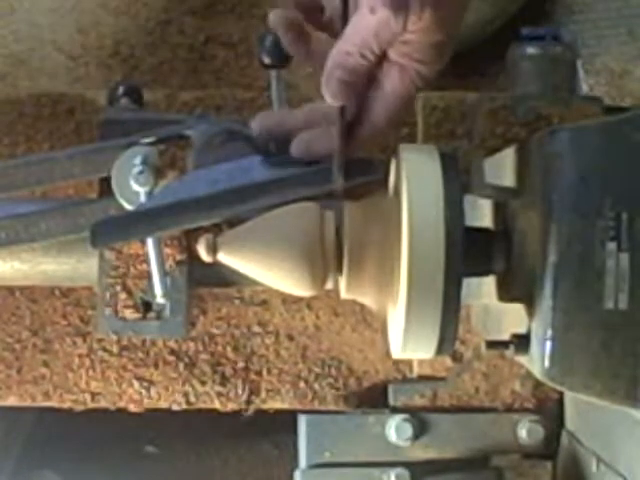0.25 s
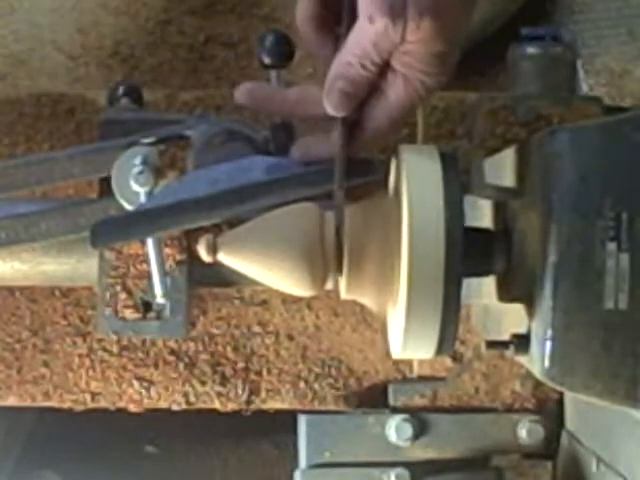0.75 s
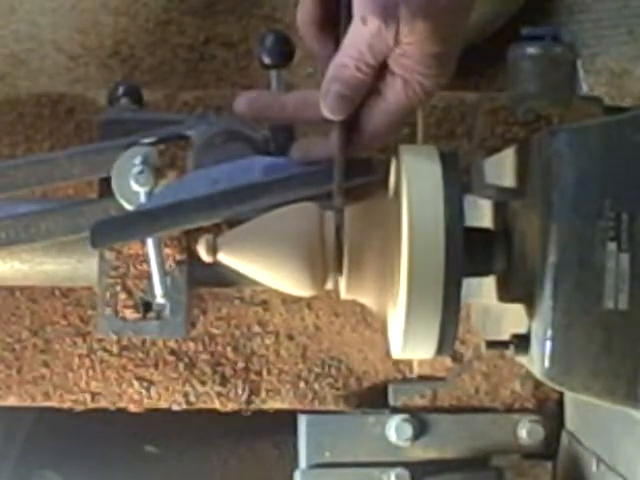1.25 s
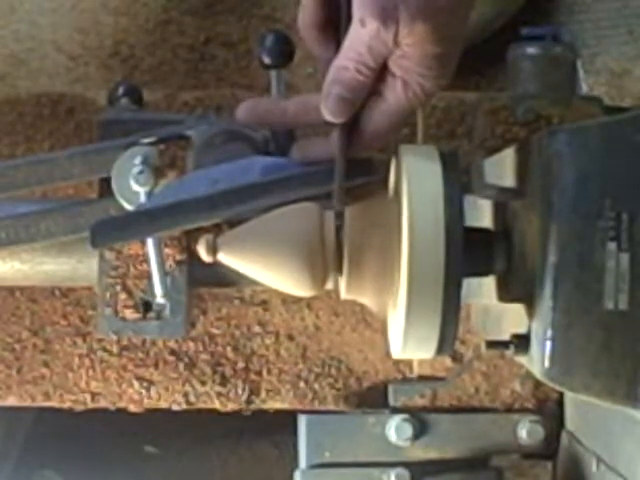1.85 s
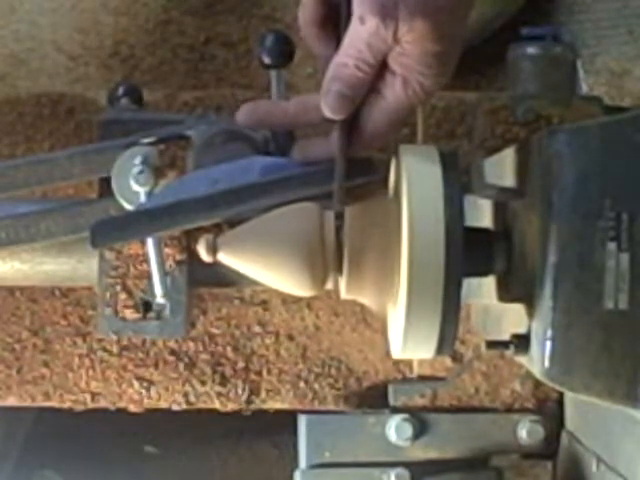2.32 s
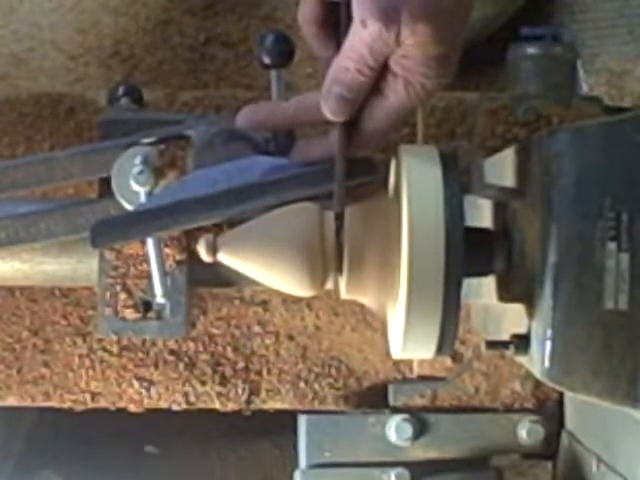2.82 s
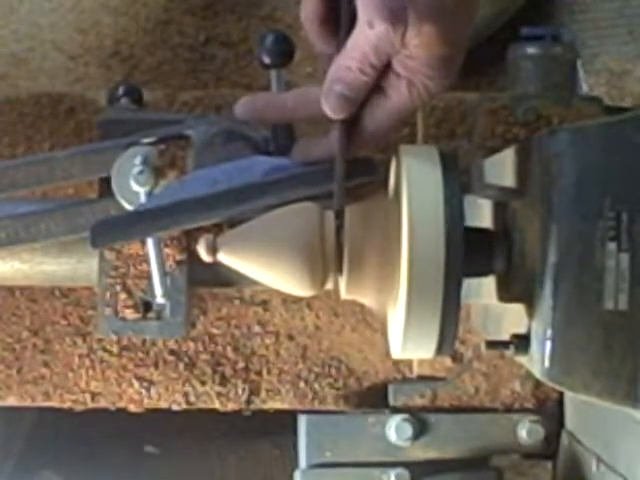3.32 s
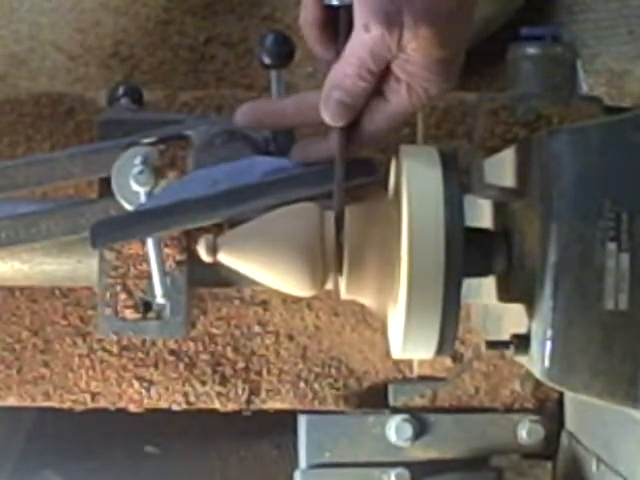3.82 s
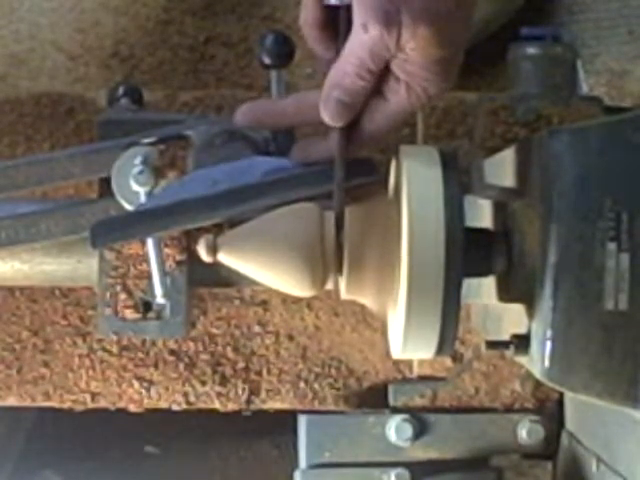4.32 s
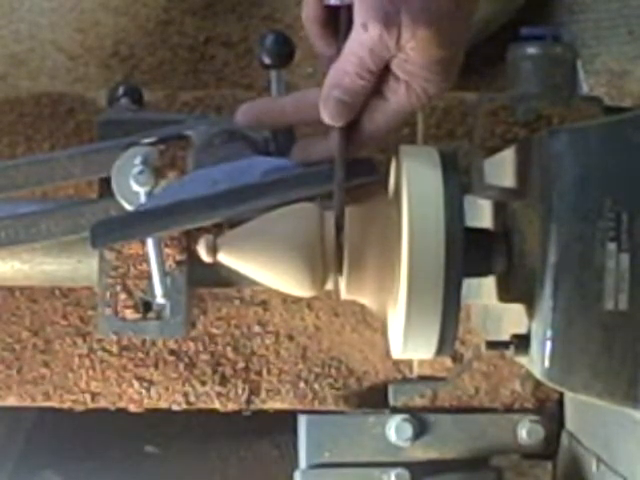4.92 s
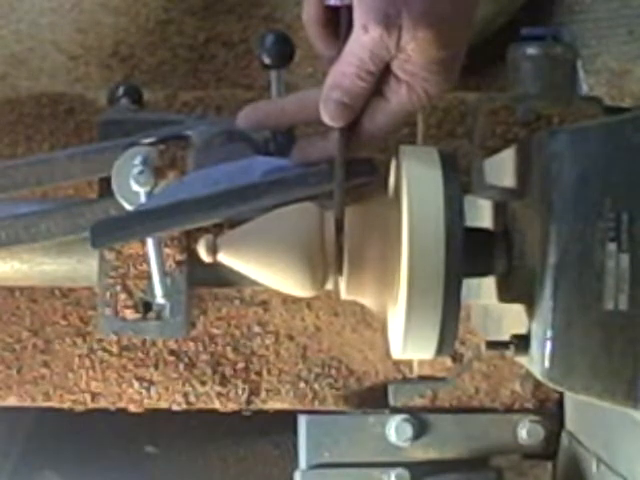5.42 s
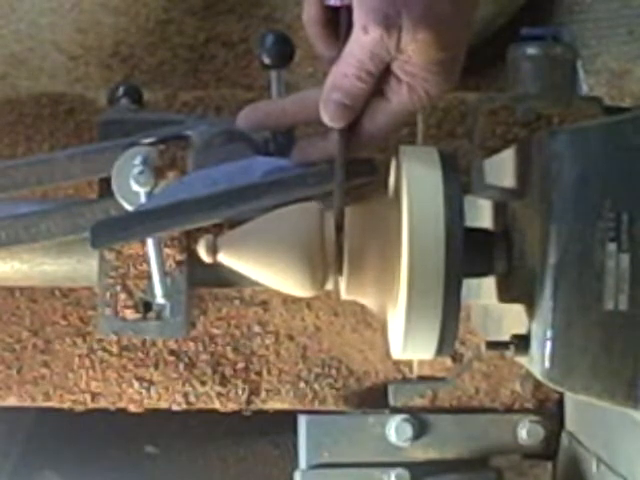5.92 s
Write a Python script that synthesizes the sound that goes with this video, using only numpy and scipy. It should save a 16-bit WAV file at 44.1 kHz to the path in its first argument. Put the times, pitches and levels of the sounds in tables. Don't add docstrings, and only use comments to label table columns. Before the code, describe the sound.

Throbbing motor hum and faint metallic buzzes give way to two harsh, ringing scrapes of a steel tool on fast-turning wood.

```python
import sys
import numpy as np
from scipy import signal
from scipy.fft import rfft, irfft, next_fast_len
from scipy.io import wavfile
from scipy.ndimage import uniform_filter1d

SR = 44100
rng = np.random.default_rng(int(sys.argv[2]) if len(sys.argv) > 2 else 0)


def magnitude_from_level(level_db):
    exponent = np.asarray(level_db, float) / 20
    return 10 ** exponent


def unload_wav(signal):
    wavfile.write(
        sys.argv[1],
        SR,
        np.round(np.clip(np.atleast_2d(signal).T, -1, 1) * 32767).astype(np.int16),
    )


N = 271656
REGRIP_S = 3.2
MAINS_HZ, BELT_HZ = 60.0, 5.96
SPINDLE_HZ = 24.5


def rms_one(x):
    return x / np.sqrt(np.mean(x ** 2) + 1e-20)


def in_time(rows):
    s, *columns = np.transpose(rows)
    return [np.interp(np.arange(N) / SR, s, c) for c in columns]


def at_hz(points, hz):
    table_hz, values = np.array(points).T[:2]
    return np.interp(np.log(hz + 1), np.log(table_hz), values)


def drift(rate):
    r = np.exp(-80 * np.pi * rate / SR)
    chance = rng.standard_normal(N // 40 + 2002)
    slow = signal.lfilter([1], [1, -2 * r, r * r], chance)[2000:]
    return np.interp(np.arange(N) / 40, np.arange(len(slow)), rms_one(slow))


def resonance(x, hz, width_hz):
    r = np.exp(-np.pi * width_hz / SR)
    top = np.array([1, 0, -1]) * (1 - r * r) / 2
    return signal.lfilter(top, [1, -2 * r * np.cos(2 * np.pi * hz / SR), r * r], x)


def coloured(x, gain):
    size = next_fast_len(N)
    return irfft(rfft(x, size) * gain(np.fft.rfftfreq(size, 1 / SR)), size)[:N]


def spells(rows, swell_s):
    t = np.arange(N) / SR
    gain = np.zeros(N)
    for s, length_s, level_db in rows:
        to_nearest_end = np.minimum(t - s, s + length_s - t)
        gain += magnitude_from_level(level_db) * np.clip(to_nearest_end / swell_s + .5, 0, 1) ** 2
    return gain


def by_cut(first, second):
    return np.where(np.arange(N) / SR < REGRIP_S, first, second)


# (time [s], level [dB])
PRESSURE = [(1.4, -48.5), (1.49, -43.5), (1.53, -32), (1.66, -31), (1.73, -22), (2.04, -22), (2.4, -19.5),
            (2.78, -22), (2.9, -19.5), (3.03, -22.5), (3.15, -43), (3.24, -36.5), (3.47, -34.5),
            (3.58, -28.5), (3.79, -28), (3.86, -25), (5.35, -21), (6.16, -22)]


def pressure_swing():
    firm_db = -22
    return in_time(PRESSURE)[0] - firm_db


# (mains multiple [count], belt multiple [count], level [dB], lead [rad])
HUM = [(4, 0, -27.5, 0), (4, -3, -35, -1.15), (4, -2, -39, 2.1), (4, -1, -41, 0.3), (4, 1, -46, -2.6),
       (4, 2, -39, 2.4), (4, 3, -46, 2.3), (2, 0, -47, 0), (2, -3, -45, -1.3), (2, 3, -50, -0.2)]
# (pitch [Hz], level [dB])
WHINE = [(594, -58), (812, -57), (2379, -67), (6643, -69), (7596, -68), (7655, -68)]
# (frequency [Hz], level [dB per Hz])
IDLE = [(12, -61), (22, -20), (54, -16.5), (108, -21), (162, -18.5), (300, -16.5), (400, -18), (680, -21.5),
        (1660, -31), (3300, -31.5), (4720, -24.5), (5600, -33), (7100, -31), (8000, -46), (9000, -57),
        (12000, -87)]
# (pitch [Hz], width [Hz], level [dB])
BED = [(3775, 230, -52), (4250, 260, -53.5), (4560, 260, -55), (2530, 380, -55.5), (6460, 190, -54.5)]
# (pitch [Hz], width [Hz], level [dB])
BED_BOOM = (230, 45, -37)


def motor():
    t = np.arange(N) / SR
    load = uniform_filter1d(magnitude_from_level(pressure_swing()), size=6000)
    flap_db = 2 - 9.5 * load
    out = np.zeros(N)
    for mains, belt, level_db, lead in HUM:
        loose_db = flap_db if mains == 4 and belt else 0
        sway = magnitude_from_level(level_db + loose_db + 0.32 * drift(3.9))
        hz = mains * MAINS_HZ + belt * BELT_HZ
        out += np.sqrt(2) * sway * np.cos(2 * np.pi * hz * t + lead + 0.83 * drift(0.92))
    for hz, level_db in WHINE:
        sway = magnitude_from_level(level_db + 6.9 * drift(15.0))
        out += np.sqrt(2) * sway * np.cos(2 * np.pi * hz * t + 0.36 * drift(1.9))
    for hz, width_hz, level_db in BED + [BED_BOOM]:
        rumble = resonance(resonance(rng.standard_normal(N), hz, width_hz), hz, width_hz)
        out += magnitude_from_level(level_db) * rms_one(rumble)
    fan = coloured(rng.standard_normal(N), lambda hz: magnitude_from_level(at_hz(IDLE, hz)))
    return out + magnitude_from_level(-36.5 + 0.8 * drift(14)) * rms_one(fan)


# (time [s], length [s], level [dB])
GUARD = [
    (.03, .12, -46),
    (.25, .05, -45),
    (.41, .04, -37),
    (.68, 0.32, -44.5),
    (1.15, 0.075, -43),
    (1.3, 0.44, -45),
    (1.9, 0.098, -42),
    (2.07, 0.067, -29),
    (2.25, 0.146, -56),
]


def guard():
    always = (2.4, N / SR, -52.5)
    gain = spells(GUARD + [always], swell_s=0.12)
    return np.sqrt(2) * gain * np.cos(2 * np.pi * 685 * np.arange(N) / SR + 1.0 * drift(9.1))


# (time [s], peak level [dB])
SET_DOWN = [
    (0.098, -28.5),
]


def knocks():
    clicks = np.full(N, 1e-18)
    for s, peak_db in SET_DOWN:
        clicks[round(s * SR)] = magnitude_from_level(peak_db + 43.5)
    low, middle = resonance(clicks, 550, 25), resonance(clicks, 700, 30)
    return low + .25 * middle + 0.24 * resonance(clicks, 1150, 60)


def chips(dust_db):
    strength = magnitude_from_level(3.2 * np.minimum(rng.exponential(1, N), 3))
    snaps = (rng.random(N) < 120 / SR) * strength * rng.choice([-1, 1], N)
    return magnitude_from_level(dust_db + 13.5) * resonance(resonance(snaps + 1e-18, 8000, 1200), 7400, 1300)


# (pitch [Hz], width [Hz])
BLADE = [(1635, 120), (1780, 35), (2415, 40), (4740, 220), (4130, 45), (5110, 70), (3480, 260), (2020, 40)]
# (time [s], length [s], level [dB])
SPELLS = [
    [(1.66, 0.317, -33.5), (2.3, .75, -39.5), (3.25, .3, -45), (5.1, 0.89, -40)],
    [(1.67, .14, -40), (2.2, 0.45, -38.5), (2.72, 0.34, -33), (5.05, 0.67, -40)],
    [(1.5, .1, -43), (2.2, .6, -35.5), (3.3, .12, -36), (3.9, 0.16, -37), (4.7, 1, -43.5)],
    [(1.72, 0.52, -33), (2.3, .75, -31.5), (3.56, .1, -25), (4.25, 0.35, -28)],
    [(1.95, 1.1, -36.5), (4.9, 0.69, -36)],
    [(2.145, .9, -25.5)],
    [(1.56, .2, -31.5), (3.05, 1.6, -36), (3.6, 0.73, -45.5)],
    [(1.57, .06, -31), (3.1, .12, -43)],
]
MURMUR_DB = (-46.5, -45.5, -43, -32.5, -43, -44, -40.5, -57.5)
KNOCK_DB = (5.3, 4, 1.1, .6, 1.1, .6, .6, .6)


def blade(force, turns, swing_db):
    end_grain = 4 * np.pi * turns
    kicked = force * magnitude_from_level(1.4 * np.cos(end_grain))
    out = np.zeros(N)
    for (hz, width_hz), rows, murmur_db, knock_db in zip(BLADE, SPELLS, MURMUR_DB, KNOCK_DB):
        ring = resonance(resonance(kicked, hz, width_hz), hz, 3 * width_hz)
        slow = np.sqrt(uniform_filter1d(ring ** 2, size=6000))
        gain = np.hypot(spells(rows, swell_s=0.05), magnitude_from_level(murmur_db + 0.68 * swing_db))
        out += gain / 2 * ring / slow * magnitude_from_level(knock_db * np.cos(end_grain + 1.8))
    return out


MULTIPLES = [4, 8, 9, 10, 11, 12, 13, 14, 16, 17, 18, 19, 20, 21, 22, 23, 24, 25, 26, 27, 28, 32, 36]
# (first cut level [dB], second cut level [dB])
THRUST = [(-15.5, -18), (-6, -6), (-14, -15.5), (-50, -3.5), (-12, -15), (-23, -26), (-21, -17), (-8, -7.5),
          (-17, -25), (-15.5, -28), (-17, -22), (-20, -22.5), (-13, -25), (-21.5, -17.5), (-8, -9.5),
          (-17, -13), (-11.5, -8.5), (-23, -11.5), (-24.5, -30.5), (-29.5, -12), (-16.5, -16), (-24, -18.5),
          (-19, -19)]


def thrust(turns, depth_s, rest_hz):
    out = magnitude_from_level(-6.5) * rms_one(resonance(rng.standard_normal(N), 556, 150))
    for multiple, level_db in zip(MULTIPLES, THRUST):
        darker_db = 1 * (depth_s - 1) * np.clip(np.log2(16 / multiple), -1, 1)
        off_rest = (multiple * SPINDLE_HZ - rest_hz) / 26
        lift_db = 6 / (1 + off_rest ** 2)
        level = magnitude_from_level(by_cut(*level_db) + darker_db + lift_db + 1.3 * drift(5.9))
        lead = -.1 + .11 * rng.standard_normal()
        phase = 2 * np.pi * (multiple * (turns + .5) + lead)
        out += np.sqrt(2) * level * np.cos(phase + 0.67 * drift(3.4))
    return out


def round_the_blank(turns, size, memory):
    count, keep = int(turns[-1]) + 42, np.clip(memory, 0, .99)
    fresh = rng.standard_normal((count, size))
    surface = signal.lfilter([np.sqrt(1 - keep ** 2)], [1, -keep], fresh, axis=0)[40:].ravel()
    return np.interp(turns * size, np.arange(len(surface)), surface)


# (frequency [Hz], share [0-1])
REPEATS = [(700, .85), (2500, 0.44), (3300, 0.42), (5000, 0.24), (8000, 0.34)]


def scraping(turns):
    bite_db = 1.1 * round_the_blank(turns, size=10, memory=.9)
    bite_db += .5 * np.cos(4 * np.pi * turns) + 0.52 * drift(21)
    bite_db += 0.58 * np.cos(6 * np.pi * BELT_HZ * np.arange(N) / SR + .3)
    grain = round_the_blank(turns, size=1024, memory=0.934)

    def share(hz):
        return np.clip(at_hz(REPEATS, hz), 0, 1)

    def grain_gain(hz):
        return np.sqrt(share(hz)) / np.clip(np.sinc(hz / 25000) ** 2, .1, 1)

    returning = coloured(grain, grain_gain)
    tearing = rng.standard_normal(N) * magnitude_from_level(0.75 * np.minimum(rng.exponential(1, N), 3))
    fresh = coloured(rms_one(tearing), lambda hz: np.sqrt(1 - share(hz)))
    return magnitude_from_level(bite_db) * (1.3 * returning + fresh)


# (pitch [Hz], width [Hz], level [dB])
TIP_RING = (5110, 150, 5)


def tool(force, colour, rings):
    x = force.copy()
    for hz, width_hz, level_db in rings + [TIP_RING]:
        x += magnitude_from_level(level_db + 0.5) * resonance(force, hz, width_hz)
    return coloured(x, lambda hz: magnitude_from_level(at_hz(colour, hz)))


# (frequency [Hz], level [dB per Hz])
FIRST = [(410, -37), (700, -6), (730, -20), (876, -14), (1430, -14.5), (1730, -11), (2030, -11.5),
         (2360, -8), (2740, -10.5), (3980, -0.5), (4330, -2), (5140, -7.5), (5480, -6.5), (7000, -9),
         (8940, -37), (11600, -67), (19700, -120)]
# (frequency [Hz], level [dB per Hz])
SECOND = [(410, -48.5), (700, -4), (730, -34), (1010, -7.5), (1440, -13), (1660, -7.5), (2120, -6.5),
          (2410, -4.5), (2830, -12.5), (3180, -7.5), (3980, 4.5), (4330, 0.5), (4920, -6.5), (7150, -8),
          (8940, -35.5), (11600, -69), (19700, -120)]
# (pitch [Hz], width [Hz], level [dB])
FIRST_RING = [(3225, 60, -1), (3840, 80, -4), (4128, 60, 1), (4740, 150, -5), (6310, 70, -7)]
# (pitch [Hz], width [Hz], level [dB])
SECOND_RING = [(3230, 140, 3.5), (3714, 54, 1), (4010, 170, -13.5), (5000, 640, -5), (6430, 59, -6.5),
               (7730, 23, -2), (8100, 74, -19.5)]
# (time [s], peak level [dB])
TOUCHES = [(1.441, -21), (1.457, -22), (1.4977, -19), (1.52, -44), (1.545, -18.5), (1.5984, -23.5),
           (1.6856, -19), (3.1941, -33), (3.5494, -21), (3.6072, -21), (4.965, -23.5), (5.413, -15)]
# (share of swing [ratio], first cut level [dB], second cut level [dB])
BAND_LAWS = [
    (.65, -33.5, -32),
    (.999, -22.5, -22),
    (1.05, -29, -28.5),
]
# (time [s], level [dB], pitch [Hz])
FEED = [(1.4, -45, 535), (1.64, -38.5, 535), (1.75, -38.5, 526), (2.3, -31, 548), (2.65, -28, 530),
        (2.88, -32, 513), (3.05, -35, 524), (3.14, -45.5, 527), (3.48, -44, 534), (3.6, -34, 530),
        (3.88, -30.5, 562), (4.2, -30, 573), (4.7, -28, 585), (4.95, -30, 580), (5.25, -28, 517),
        (6.16, -26.5, 540)]


def cut():
    t = np.arange(N) / SR
    depth_s = np.clip(t - by_cut(1.7, 3.55), 0, None)
    turns = np.cumsum(SPINDLE_HZ - by_cut(.06, .093) * depth_s) / SR
    swing_db = pressure_swing()
    band_db = [by_cut(first_db, second_db) + share * swing_db for share, first_db, second_db in BAND_LAWS]
    thrust_db, rest_hz = in_time(FEED)
    force = scraping(turns)
    sounds = [tool(force, FIRST, FIRST_RING), tool(force, SECOND, SECOND_RING)]

    bite = np.clip((t - 1.66) / 0.07, .2, 1)
    out = magnitude_from_level(thrust_db) * bite * thrust(turns, depth_s, rest_hz)
    out += blade(force, turns, swing_db) + chips(band_db[2])
    edges_hz = [0, 2850, 5550, SR]
    for low, high, level_db in zip(edges_hz, edges_hz[1:], band_db):
        def part(hz):
            return np.clip((hz - low) / 300 + .5, 0, 1) - np.clip((hz - high) / 300 + .5, 0, 1)
        first, second = (rms_one(coloured(s, part)) for s in sounds)
        out += magnitude_from_level(level_db + 0.42 * drift(3.7)) * by_cut(first, second)
    for s, peak_db in TOUCHES:
        fade = np.exp(-np.clip(t - s, 0, 1) / .016) * np.clip((t - s) / .002, 0, 1)
        out += rms_one(sounds[0]) * magnitude_from_level(peak_db - 10) * fade
    return out * np.clip((t - PRESSURE[0][0]) / 0.023, 0, 1)


def scene():
    return (motor() + guard() + knocks() + cut())[None]


def low_pass(x):
    return signal.sosfilt(signal.butter(12, 9090, fs=SR, output="sos"), x)


def record(dry):
    sampler_hz = 16000
    top = signal.butter(24, 8720, fs=SR, output="sos")
    mirror = 2 * 0.9 * dry * np.cos(2 * np.pi * sampler_hz * np.arange(N) / SR)
    smoothing = signal.butter(N=20, Wn=8006, fs=SR, output="sos")
    sampled = signal.sosfilt(np.vstack([smoothing, top]), dry + mirror)
    return low_pass(sampled)


dry = scene()
out = record(dry)
unload_wav(out)
```